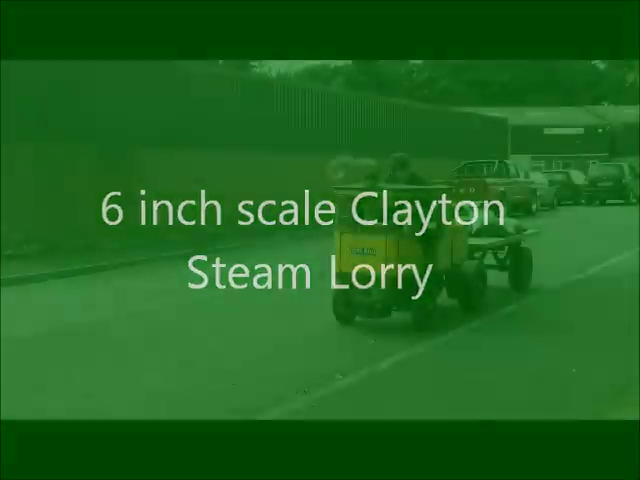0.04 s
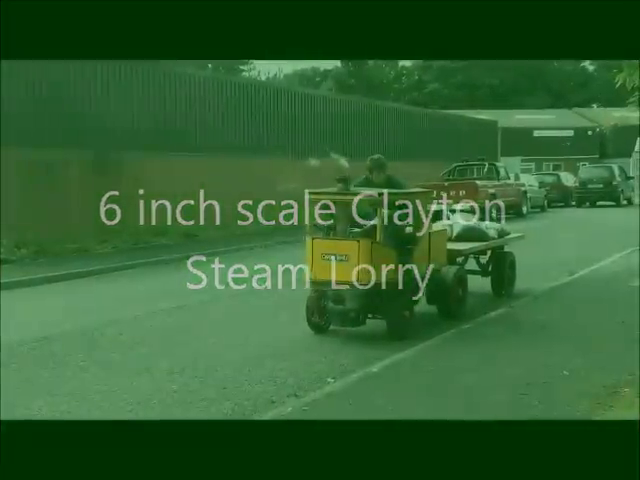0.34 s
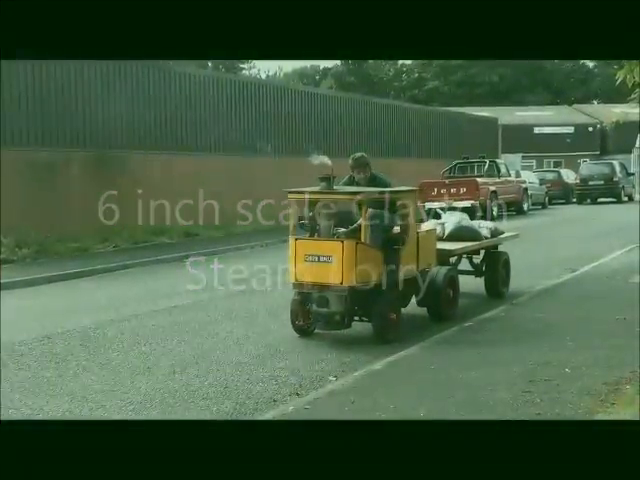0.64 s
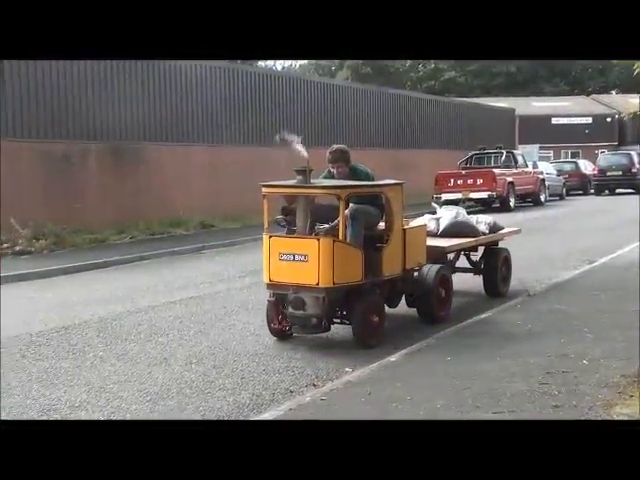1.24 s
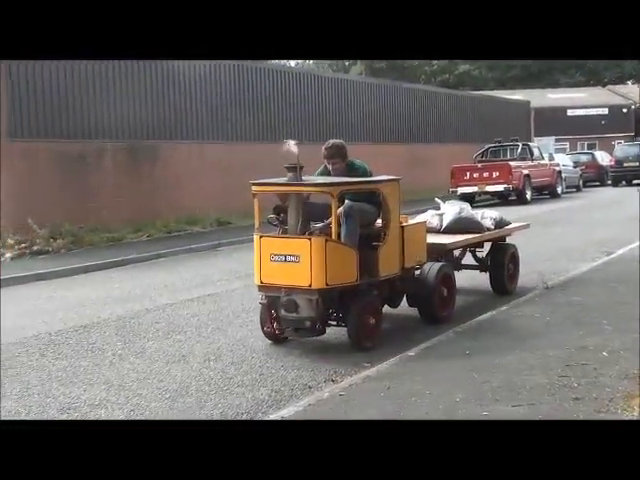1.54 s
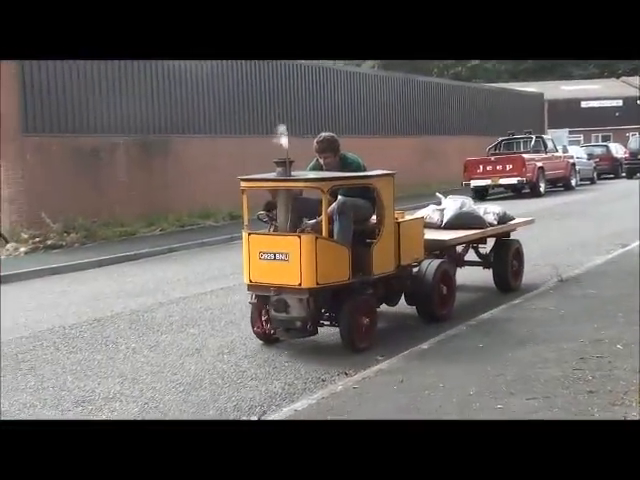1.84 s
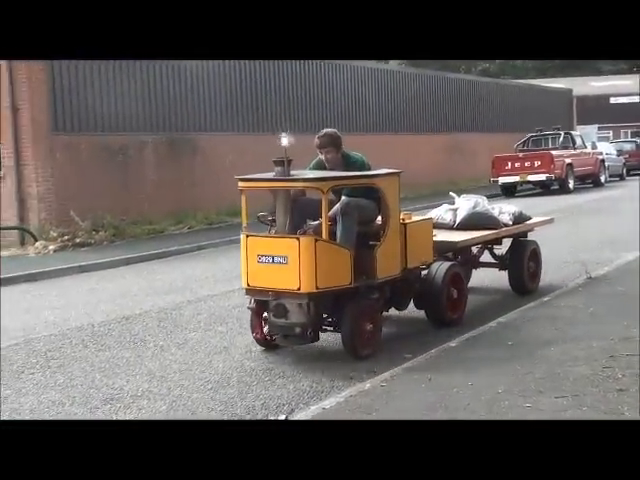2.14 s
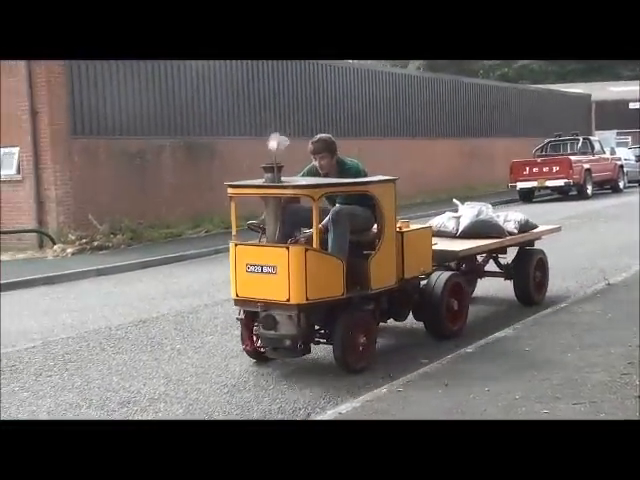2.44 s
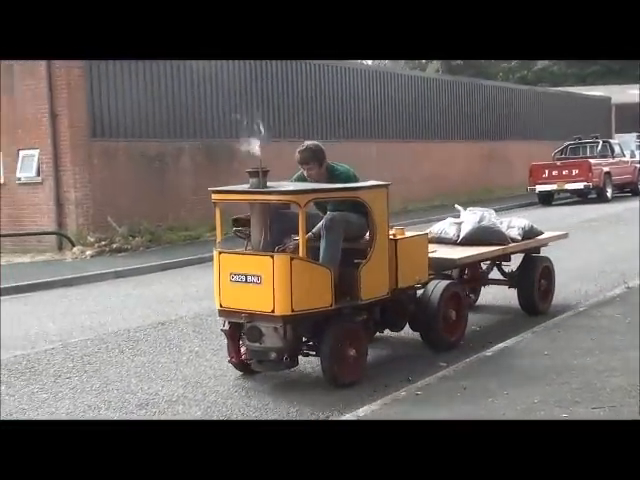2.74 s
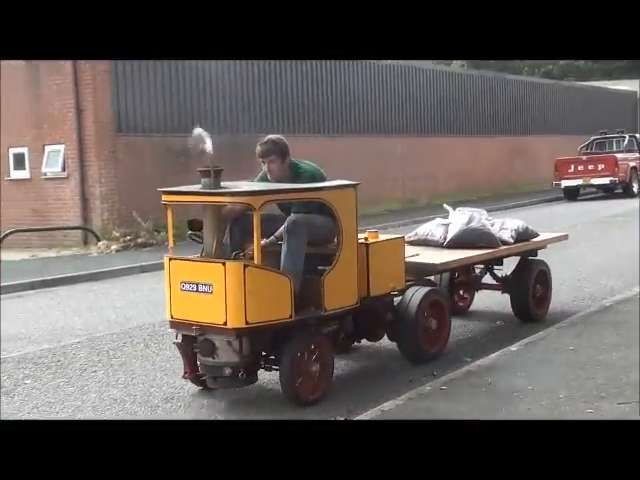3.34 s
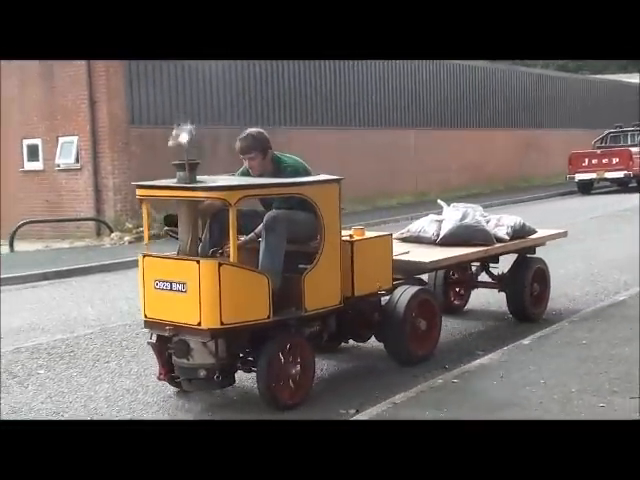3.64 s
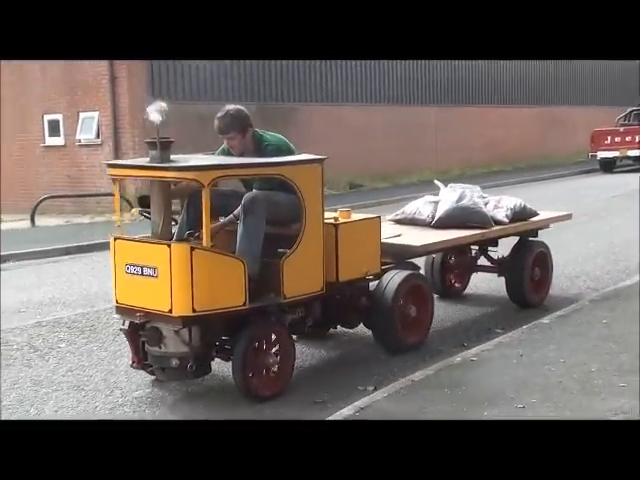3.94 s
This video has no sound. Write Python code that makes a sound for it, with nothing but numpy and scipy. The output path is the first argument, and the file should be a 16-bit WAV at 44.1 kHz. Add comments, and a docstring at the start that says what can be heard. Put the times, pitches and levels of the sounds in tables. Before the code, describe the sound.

A miniature steam lorry chuffs rapidly as it approaches along a street, hissing over a low wheel rumble. Its chassis thumps and knocks, light wind brushes the microphone, and grit snaps once midway before the chuffing peaks.

```python
"""After a moment of silence a miniature steam lorry is heard nearing along a street, wheels rumbling.
From the outset it chuffs about 8.5 times a second: each exhaust beat hisses at the blast nozzle and excites
the hollow chimney, steam rushes between beats, and the road and a brick wall reflect the sound.
Within the first second the chassis thumps and knocks and wind starts to brush the microphone. Grit snaps
sharply just before 2 s; a narrow tone then swells, and the beats peak at 2.5-3 s before easing a little."""
import sys
import numpy as np
from scipy import signal
from scipy.fft import rfft, irfft
from scipy.io import wavfile
from scipy.ndimage import map_coordinates

SR = 44100
rng = np.random.default_rng(int(sys.argv[2]) if len(sys.argv) > 2 else 0)


def inscribe(sig):
    """Save sig as 16-bit PCM at rate SR to the path in sys.argv[1].

    A 1-D sig is mono; a 2-D sig holds one channel per row.
    Samples are clipped to [-1, 1] before scaling.
    """
    pcm = np.round(np.clip(np.atleast_2d(sig).T, -1, 1) * 32767)
    wavfile.write(sys.argv[1], SR, pcm.astype(np.int16))


N = 176400
TIME = np.arange(N) / SR
FREQS = np.fft.rfftfreq(N, 1 / SR)

# Levels are relative within each table.
# left-right correlation of the lorry's noise: (frequency [Hz], correlation [0-1])
LORRY_COHERENCE = [(30, .98), (120, 1), (280, 1), (480, 0.98), (700, .99), (1200, 1), (2500, 0.98),
                   (5000, 0.94), (8000, 0.99), (10500, 1), (13000, .999)]
# the same for wind, nearly mono at its deepest: (frequency [Hz], correlation [0-1])
WIND_COHERENCE = [(30, .92), (70, .8), (120, .5), (220, .3), (500, .2)]
# wind noise: (frequency [Hz], spectral level [dB])
WIND_SPECTRUM = [(20, -36), (32, -20), (50, -11.5), (95, -1.5), (160, -2.5), (240, -6.5), (400, -20),
                 (2000, -60), (16000, -90)]
# Gaussian gusts: (time [s], level [dB], standard deviation [s])
GUSTS = [(0.795, -23, 0.013), (0.869, -22.5, 0.033), (0.99, -23.5, 0.017), (1.137, -23, 0.017),
         (1.356, -31, .025), (1.697, -18.5, 0.011), (1.96, -27.5, 0.058), (2.32, -27.5, 0.088),
         (2.473, -22.5, 0.037), (2.56, -21.5, 0.021), (2.977, -30, 0.011), (3.63, -30, 0.019)]
# reflections from the lorry's body and the wall: (delay [s], gain [dB])
REFLECTIONS = [(.0062, -19), (0.0146, -21), (.046, -16)]
# reflection from the road: (frequency [Hz], gain [dB])
ROAD_REFLECTANCE = [(200, -15.5), (1300, -7), (3500, -11.5), (7500, -13), (16000, -17)]
# wheels on the road: (frequency [Hz], spectral level [dB])
ROLLING_SPECTRUM = [(20, -40), (40, -14), (62, -7.5), (105, 1.5), (190, -5), (290, 2.5), (400, -8),
                    (600, -23), (2000, -21.5), (16000, -70)]
# course of the rumble: (time [s], level [dB])
ROLLING_ENVELOPE = [(.1, -35), (1.4, -33), (2.3, -30.5), (3.2, -31.5), (4, -31.5)]
# grit snapping under the wheels: (time [s], level [dB])
GRIT_SNAPS = [(.590, -14), (.597, -17), (1.8474, 4)]
# course of the narrow tone: (time [s], level [dB])
TONE_ENVELOPE = [(.1, -38.5), (1.9, -38.5), (2.3, -34), (2.7, -30), (3.1, -32.5), (3.55, -31), (4, -36.5)]
# chassis thumps: (time [s], level [dB])
CHASSIS_THUMPS = [(.19, -28.5), (0.745, -23), (0.945, -24.5), (1.137, -22), (1.334, -28), (1.906, -24),
                  (2.485, -28), (2.61, -27), (2.949, -20), (3.08, -39), (3.319, -37), (3.423, -30),
                  (3.57, -26.5), (3.883, -27.5)]
# knocks in the drive: (time [s], level [dB], frequency [Hz], width [Hz])
DRIVE_KNOCKS = [(0.855, -21, 730, 200), (1.33, -22, 760, 200), (1.802, -23.5, 696, 300),
                (2.271, -20.5, 740, 350), (2.84, -14, 1030, 600), (3.655, -22.5, 740, 300)]
# chimney resonances: (frequency [Hz], width [Hz], level [dB])
CHIMNEY_MODES = [(270.6, 51, -2), (676, 103, -5), (764, 80, -3.5), (1081, 72, -4), (1521.5, 68, -2),
                 (1895, 72, -3.5), (2305, 134, -8), (2754, 65, -5), (2900, 33, -9), (3092, 42, -5),
                 (3327, 74, -2), (3602, 50, -1), (3870, 150, -4)]
# steam rushing between beats: (frequency [Hz], spectral level [dB])
RUSH_SPECTRUM = [(400, -15), (900, -6), (1300, -13), (2500, -9.5), (3300, -13), (3950, 0), (4500, -6.5),
                 (5500, -9.5), (6500, -1.5), (7600, 2), (8400, -5), (9500, -6.5), (10400, -11.5),
                 (12500, -18), (13200, -19.5), (16000, -21)]
# that rush as the lorry nears: (time [s], nozzle level [dB], chimney level [dB])
RUSH_ENVELOPE = [(.1, -25.5, -28.5), (.6, -24, -27), (1.2, -21.5, -25), (1.7, -20, -23), (2, -21, -25.5),
                 (2.6, -18, -23), (3.1, -16.5, -21.5), (3.55, -17.5, -24), (4, -20.5, -25)]
# nozzle hiss of a beat: (frequency [Hz], spectral level [dB])
PUFF_SPECTRUM = [(500, -52), (2400, -19), (3200, -14), (3950, -7.5), (4450, -9), (5500, -9.5), (6500, -3),
                 (7650, 2), (8300, -6.5), (9500, -5), (10300, -13.5), (12600, -14), (13000, -20),
                 (16000, -22)]
# narrow resonances colouring the steam: (frequency [Hz], width [Hz], lift [dB])
STEAM_RESONANCES = [(5260, 97, 5), (5680, 25, 6.5), (6070, 38, 9), (6180, 36, 4.5), (6550, 93, 5),
                    (7000, 70, 4), (7520, 81, 2.5), (7880, 140, 2.5), (8410, 90, 6), (9400, 120, 0.5)]
# exhaust beats: (time [s], nozzle level [dB], chimney level [dB])
EXHAUST_BEATS = [(0.137, -17, -23.6), (0.249, -17.5, -19.5), (0.373, -18.5, -21), (0.497, -20, -21.5),
                 (0.616, -14, -21), (0.729, -16, -19.5), (0.853, -16.5, -25), (0.974, -18.5, -24),
                 (1.093, -12.6, -19), (1.206, -13.5, -18), (1.328, -15.5, -19.5), (1.444, -15, -19),
                 (1.566, -12, -19.5), (1.677, -14, -18.5), (1.797, -14.5, -17.5), (1.917, -15.5, -19.5),
                 (2.036, -11.3, -19), (2.148, -13, -17), (2.268, -14.5, -19.5), (2.387, -14, -18.5),
                 (2.505, -10.1, -16.5), (2.615, -11, -16), (2.732, -12.5, -18), (2.847, -11.8, -21),
                 (2.97, -11, -16), (3.078, -11, -15.5), (3.193, -12.5, -16), (3.313, -13.5, -17.5),
                 (3.428, -12.5, -17), (3.537, -11.5, -18.5), (3.657, -13.5, -25), (3.77, -14, -18),
                 (3.887, -13.5, -21.2), (3.993, -15, -17)]

BEAT_ATTACK_S, BEAT_HOLD_S = 0.0042, 0.021
START_DISTANCE_M, SPEED_M_PER_S, SOUND_M_PER_S = 12.75, 1.3, 343
CHIMNEY_HEIGHT_M, MIC_HEIGHT_M = 1.624, 1.6


def amp(db):
    """Amplitude grows tenfold for every 20 dB."""
    return 10 ** (np.asarray(db) / 20)


def unit(x):
    """Normalisation to rms 1."""
    return x / np.sqrt(np.mean(x ** 2) + 1e-20)


def spectrum(points):
    """Interpolation of a table along a log-frequency axis."""
    hz, value = np.transpose(points)
    return np.interp(np.log(FREQS + 1), np.log(hz + 1), value)


def curve(rows, column=1):
    """Linear interpolation of a table in time."""
    rows = np.array(rows)
    return np.interp(TIME, rows[:, 0], rows[:, column])


def wobble(rate_hz):
    """Low-passed noise gives a smooth random fluctuation of rms 1."""
    return unit(irfft(rfft(rng.standard_normal(N)) * np.exp(-(FREQS / rate_hz) ** 2), N))


def noise(gain, coherence=LORRY_COHERENCE):
    """Spectrally shaped noise; the ratio of mid to side power sets its left-right correlation."""
    same = np.clip(spectrum(coherence), -1, 1)
    mid, side = rfft(rng.standard_normal((2, N))) * np.sqrt([1 + same, 1 - same]) * gain
    return unit(irfft(np.array([mid + side, mid - side]), N))


def resonance(centre_hz, width_hz):
    """A randomly driven resonator responds in a band about its natural frequency."""
    detuning = (FREQS - centre_hz ** 2 / (FREQS + 1)) / (1.6 * width_hz)
    return noise((1 + detuning ** 2) ** -.75)


def burst(start, attack_s, hold_s, decay_s):
    """A transient's envelope: rise, hold and exponential decay."""
    age = TIME - start
    return np.clip(age / attack_s, 0, 1) ** 0.5 * np.exp(-np.maximum(age - hold_s, 0) / decay_s)


def wind():
    """Turbulent pressure on the microphone makes brief low buffets."""
    gusts = sum(amp(db) * np.exp(-.5 * ((TIME - s) / sigma) ** 2) for s, db, sigma in GUSTS)
    return gusts * noise(amp(spectrum(WIND_SPECTRUM)), WIND_COHERENCE)


def street(x, tail_db=-29, t60_s=0.28):
    """Specular reflection gives a few echoes; diffuse reflection adds a thin decaying tail."""
    echoes = sum(amp(db) * np.pad(x, ((0, 0), (round(s * SR), 0)))[:, :N] for s, db in REFLECTIONS)
    tail = rng.standard_normal((2, SR)) * amp(-60 * TIME[:SR] / t60_s)
    tail = signal.lfilter(*signal.butter(1, 6000, fs=SR), tail)
    reverberation = signal.fftconvolve(x, tail / np.linalg.norm(tail[0]), axes=1)[:, :N]
    return x + echoes + amp(tail_db) * reverberation


def road_reflection(x):
    """Two-path interference: the bounce lags more as the lorry nears, so a comb slides down in frequency."""
    distance = START_DISTANCE_M - SPEED_M_PER_S * TIME
    lag = 2 * CHIMNEY_HEIGHT_M * MIC_HEIGHT_M / distance / SOUND_M_PER_S
    bounce = irfft(rfft(x) * amp(spectrum(ROAD_REFLECTANCE)), N)
    return x + np.array([map_coordinates(side, [(TIME - lag) * SR], order=3) for side in bounce])


def wheels():
    """Rolling contact radiates a low, unsteady rumble."""
    rumble = noise(amp(spectrum(ROLLING_SPECTRUM)))
    return rumble * amp(curve(ROLLING_ENVELOPE) + 1.2 * wobble(rate_hz=36))


def grit(start, hz=7800, decay_s=.00022):
    """A snapping grain sounds as a heavily damped oscillation."""
    age = np.maximum(TIME - start, 0)
    return np.sin(2 * np.pi * hz * age) * np.exp(-age / decay_s)


def narrow_tone():
    """Narrow-band noise is heard as a pitch, stronger while the lorry is close."""
    return amp(curve(TONE_ENVELOPE)) * resonance(centre_hz=681.2, width_hz=20)


def chassis():
    """Impacts excite one damped resonance of the body: hollow thumps."""
    impacts = sum(amp(db) * burst(s, 0.0035, 0.011, decay_s=0.028) for s, db in CHASSIS_THUMPS)
    return impacts * resonance(centre_hz=261, width_hz=32.4)


def drive():
    """Strong damping makes each knock in the drive short and broad in frequency."""
    return sum(amp(db) * burst(s, 0.0018, 0.0098, decay_s=0.0088) * resonance(hz, width)
               for s, db, hz, width in DRIVE_KNOCKS)


def chimney():
    """Pipe resonance: beats and rush, adding in power, excite the modes of the air column."""
    beat_power = sum((amp(db - 2) * burst(s, BEAT_ATTACK_S, BEAT_HOLD_S, decay_s=0.015)) ** 2
                     for s, _, db in EXHAUST_BEATS)
    rush_power = amp(curve(RUSH_ENVELOPE, column=2)) ** 2
    modes = sum(amp(db) * resonance(hz, width) for hz, width, db in CHIMNEY_MODES)
    return amp(-.5) * unit(modes) * np.sqrt(beat_power + rush_power)


def steam(points):
    """Turbulence gives broadband hiss, which narrow resonances colour."""
    lift_db = sum(db / (1 + (2 * (FREQS - hz) / width) ** 2) for hz, width, db in STEAM_RESONANCES)
    return noise(amp(spectrum(points) + lift_db))


def nozzle():
    """Jet noise: each exhaust beat releases a sputtering puff over a continuous rush of steam."""
    beat_power = sum((amp(db) * burst(s, BEAT_ATTACK_S, BEAT_HOLD_S, decay_s=0.029)) ** 2
                     for s, db, _ in EXHAUST_BEATS)
    puffs = np.sqrt(beat_power) * steam(PUFF_SPECTRUM)
    rush = amp(curve(RUSH_ENVELOPE)) * steam(RUSH_SPECTRUM)
    sputter_db = 0.64 * wobble(rate_hz=18) + 0.41 * wobble(rate_hz=2700)
    return (puffs + rush) * amp(sputter_db - 2.27)


def scene():
    """Superposition: exhaust and running noise echo in the street; wind acts at the microphone alone."""
    exhaust = road_reflection(nozzle() + chimney())
    snaps = sum(amp(db) * grit(s) for s, db in GRIT_SNAPS)
    running = wheels() + chassis() + drive() + snaps + narrow_tone()
    return street(exhaust + running) + wind()


def record(dry):
    """A fade-in after brief silence, then high-pass filtering, soft saturation and band limiting."""
    start_s, fade_s, ceiling = .095, 0.014, .92
    low_cut_hz, high_cut_hz = 30, 15750
    opened = dry * np.clip((TIME - start_s) / fade_s, 0, 1)
    thinned = signal.sosfilt(signal.butter(4, low_cut_hz, "highpass", fs=SR, output="sos"), opened)
    rounded = thinned / (1 + (thinned / ceiling) ** 8) ** (1 / 8)
    lowpass = signal.firwin(1023, high_cut_hz, window=("kaiser", 9), fs=SR)
    return signal.oaconvolve(rounded, lowpass[None], "same")


dry = scene()
out = record(dry)
inscribe(out)
```